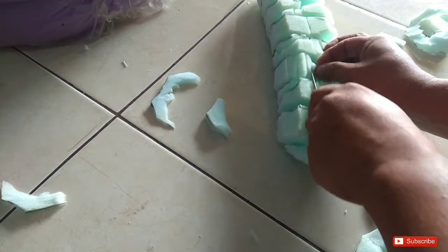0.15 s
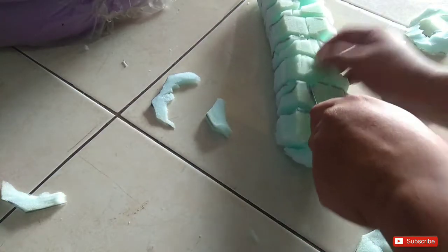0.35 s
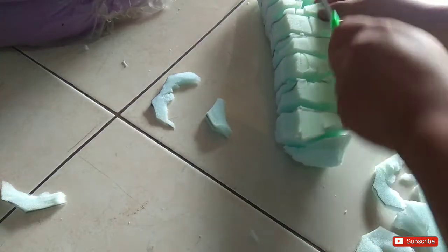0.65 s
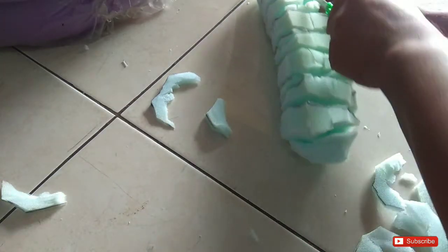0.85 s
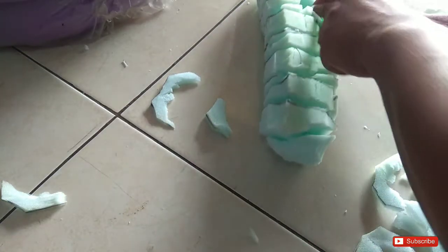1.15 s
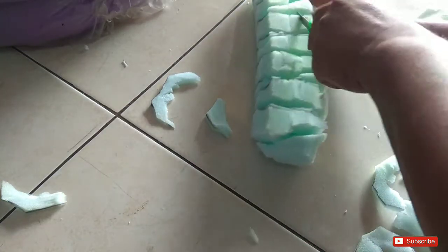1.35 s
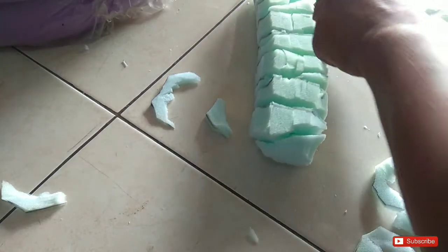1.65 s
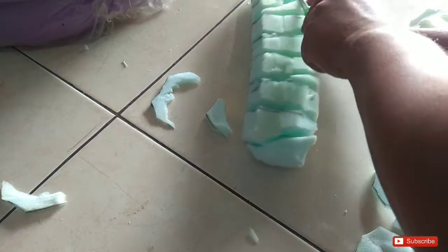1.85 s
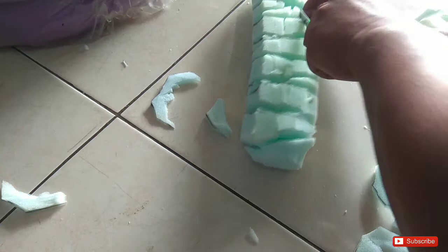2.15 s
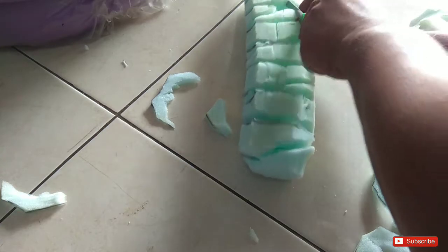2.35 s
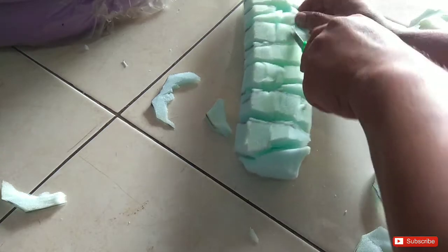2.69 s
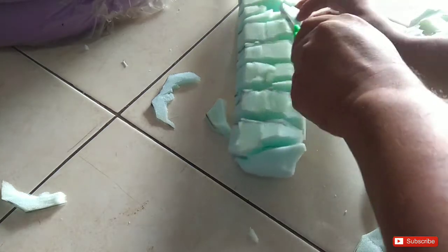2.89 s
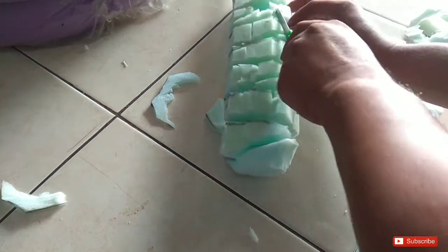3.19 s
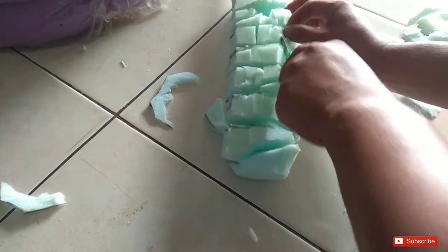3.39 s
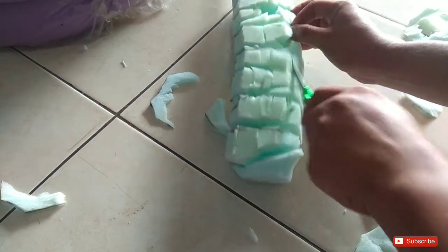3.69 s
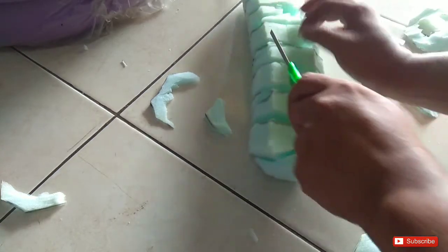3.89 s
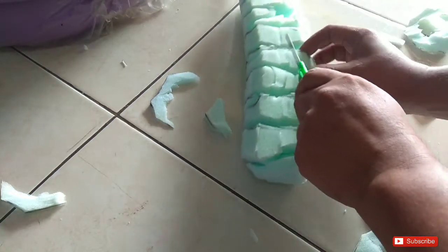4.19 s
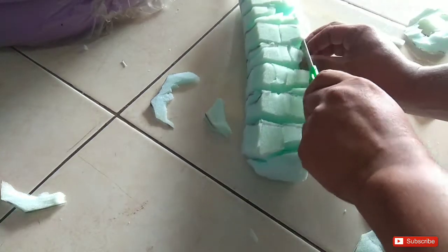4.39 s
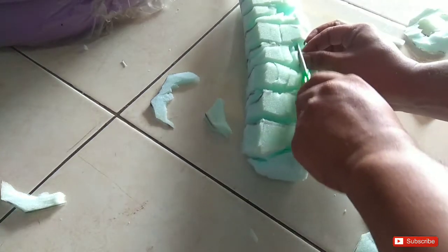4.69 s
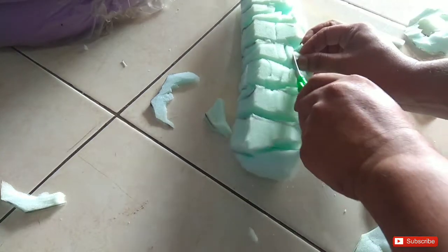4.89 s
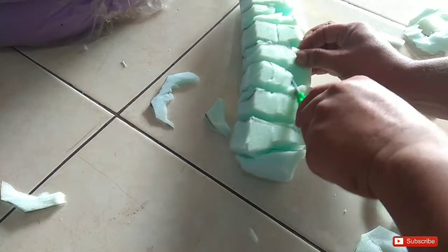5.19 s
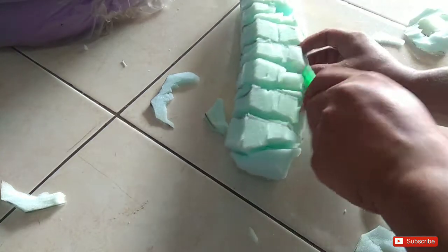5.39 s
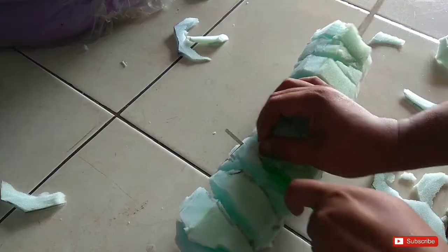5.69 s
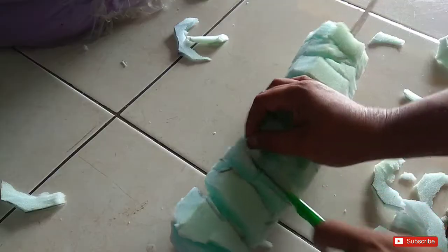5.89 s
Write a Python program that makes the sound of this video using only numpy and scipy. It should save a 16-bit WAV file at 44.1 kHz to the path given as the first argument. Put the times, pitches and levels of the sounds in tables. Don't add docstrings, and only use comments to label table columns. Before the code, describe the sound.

A knife saws slowly through foam close to a phone in a hard tiled room: airy tearing scrapes, dry snaps, faint steel ringing. Outside, a motorbike's blurred putter turns away and fades within three seconds. Quieter cutting follows, with one sharp loud snap, then an abrupt change brings a nearer, swelling low engine throb under more scrapes.

```python
import sys
import numpy as np
from scipy import signal
from scipy.fft import rfft, irfft, next_fast_len
from scipy.io import wavfile
from scipy.ndimage import uniform_filter1d

SR = 44100
rng = np.random.default_rng(int(sys.argv[2]) if len(sys.argv) > 2 else 0)


def wav_out(sig):
    wavfile.write(sys.argv[1], SR, np.round(np.clip(np.atleast_2d(sig).T, -1, 1) * 32767).astype(np.int16))


def linear_from_db(decibels):
    return 10 ** (np.asarray(decibels, float) / 20)


N = 266805
T = np.arange(N) / SR
M = next_fast_len(N + SR // 4)
F = np.maximum(np.fft.rfftfreq(M, 1 / SR), 1)
CUT_S = 5.518


def curve(table, off_db=-130):
    s, *columns = np.transpose(table)
    out = [np.interp(T, s, c) for c in columns]
    outside = (T < s[0]) | (T > s[-1] + 1 / SR)
    out[0] = np.where(outside, off_db, out[0])
    return out


def on_log(points):
    hz, value = np.transpose(points)
    return np.interp(np.log(F), np.log(hz), value)


def shape(x, gain):
    y = irfft(rfft(x, M) * gain, M)[..., :N]
    return y / np.sqrt(np.mean(y ** 2))


def resonances(peaks):
    total = 0
    for k, (hz, width_hz, db) in enumerate(peaks):
        detune = (F / hz - hz / F) * hz / width_hz
        total = total + (-1) ** k * linear_from_db(db) / (1 + 1j * detune)
    return total


def swells(s, db, rise_s, fall_s):
    roundness = 1.11
    power = np.full((len(db), N), 1e-13)
    for s, rise_s, fall_s, *db in np.broadcast(s, rise_s, fall_s, *db):
        first_s = max(s - 2.5 * rise_s, CUT_S * (s > CUT_S))
        span = slice(int(first_s * SR), int((s + 2.5 * fall_s) * SR))
        age = T[span] - s
        skirt_db = -20 * np.maximum(age / fall_s, -age / rise_s) ** roundness
        power[:, span] += (linear_from_db(np.c_[db]) * linear_from_db(skirt_db)) ** 2
    return np.sqrt(power)


# freq_hz, likeness
LIKENESS = [(60, 1), (300, 0.95), (700, 0.69), (1500, 0.29), (5000, 0.11), (15000, 0.096)]


def noise():
    like = np.clip(on_log(LIKENESS), 0, 1)
    pair = rng.standard_normal((2, N))
    mid, side = rfft(pair, M) * np.sqrt([1 + like, 1 - like])
    return irfft(np.array([mid + side, mid - side]) / 2 ** .5, M)[:, :N]


def room(x, t60_s, wet_db):
    tail = noise()[:, :SR // 2] * linear_from_db(-60 * T[:SR // 2] / t60_s)
    tail = tail / np.sqrt(np.sum(tail[0] ** 2))
    wet = signal.fftconvolve(np.atleast_2d(x), tail, axes=1)[:, :N]
    return x + linear_from_db(wet_db) * wet


def patchy(x, patchy_db, hold, span):
    t, z = signal.stft(x, SR, nperseg=512)[1:]
    shared, differing = rng.standard_normal((2,) + z.shape[1:]) * [[[1]], [[.45]]]
    chance = np.array([shared + differing, shared - differing])
    chance = chance[:, np.arange(z.shape[1]) // span]
    chance = chance[:, :, np.arange(z.shape[2]) // int(hold)]
    depth_db = np.interp(t, T, patchy_db + 0 * T)
    gain = linear_from_db(depth_db * uniform_filter1d(chance, size=4, axis=2))
    return signal.istft(z * gain, nperseg=512)[1][:, :N]


def firing(rate, jitter, scatter_db):
    chance = rng.standard_normal((400, 2))
    turns = np.cumsum(np.interp(T, *np.transpose(rate))) / SR
    edges = np.arange(400) + jitter * chance[:, 0]
    cycle = np.searchsorted(edges, turns)
    size = linear_from_db(scatter_db * chance[cycle, 1])
    pulses = size * (np.diff(cycle, prepend=cycle[0]) > 0)
    return pulses, size, np.maximum(turns - edges[cycle - 1], 0)


# peak_s, tear_db, rise_s_per_20db, fall_s_per_20db, pressure_rel_db
STROKES = [(.4, -63.5, 4, 0.73, 14.5), (0.239, -44.5, 0.43, -0.06, 3), (1.169, -48, 0.04, 0.15, 0.2),
           (1.47, -69, 0.06, 0.15, -12), (2.061, -78, 0.15, 0.4, -14), (2.413, -53.5, 0.028, 0.07, -4.5),
           (2.534, -50, 0.08, 0.12, 0), (3.6, -64.5, 0.14, 0.07, -9), (4.849, -63, 0.16, 0.06, -1.5),
           (5.018, -71, 0.01, 0.18, -10), (5.105, -46.5, 0.0866, 0.07, 1), (5.746, -47, 0.13, .09, 4.5),
           (5.875, -54.5, 0.3, 0.14, 0.5), (6.05, -57.5, 0.3, .1, 2.5)]
# peak_s, tear_db, rise_s_per_20db, fall_s_per_20db, pressure_rel_db
SQUEAKS = [
    (1.47, -70.5, -0.2, 0.3, 14),
    (3.464, -52, 0.0046, 0.06, -6),
    (4.441, -68, 0.05, 0, -6),
    (4.692, -60, 0.045, 0.08, -10),
    (5.119, -56.5, 0.0647, 0.07, 2),
]
# peak_s, tear_db, fall_s_per_20db, pressure_rel_db
CATCHES = [(0.013, -40.5, 0, 10), (0.526, -52, 0.06, 10), (1.08, -50.5, 0.21, -12), (2.084, -59, 0.06, 4.5),
           (2.259, -77, 0.05, 24), (3.337, -49.5, 0.05, -5), (3.353, -58, 0.19, -10),
           (3.562, -57, 0.05, -2), (3.665, -41, 0.0161, 8), (3.682, -52.5, 0.08, 5.5),
           (4.632, -59, 0.06, 2), (5.524, -64, 0, -2), (5.547, -59.5, 0.35, 5)]
# freq_hz, density_db_per_hz
FOAM = [(590, -57), (1000, -14), (1570, -16.5), (1720, -12.5), (2760, -9), (3320, -3), (3600, -2.5),
        (4140, -5), (5340, -4), (7120, -3), (7810, -8.5), (13800, -16), (15800, -23.5)]
# freq_hz, width_hz, level_db
STEEL = [(4505, 150, -3.5), (5987, 320, 3), (7940, 380, 2), (8710, 110, 6), (10560, 470, 0),
         (11000, 100, -2)]


def blade():
    stroke_ring_db, squeak_ring_db, catch_ring_db = -4, 7.5, -7
    catch_rise_s = 0.0067
    edge_hz, under_share = 4070, 0.13
    rows = [row + (stroke_ring_db,) for row in STROKES]
    rows += [row + (squeak_ring_db,) for row in SQUEAKS]
    rows += [(s, db, catch_rise_s, fall_s, low_db, catch_ring_db) for s, db, fall_s, low_db in CATCHES]
    s, db, rise_s, fall_s, low_db, ring_db = np.transpose(rows)
    levels = swells(s, [db, db + low_db, db + ring_db], rise_s, fall_s)
    force, deep, free = uniform_filter1d(levels, size=60)
    crack_size = linear_from_db(2.74 * np.minimum(rng.exponential(size=N), 1.7))
    cracks = (rng.random(N) < 2500 / SR) * crack_size
    tear = (0.43 + 9 * uniform_filter1d(cracks, size=40)) * noise()
    foam = linear_from_db(on_log(FOAM))
    share = np.clip((F - 7500) / 2000, 0, 1)
    thinning = under_share + 1 / (1 + (edge_hz / F) ** 14)
    high = shape(tear, foam * share)
    low = shape(tear, foam * (1 - share) * thinning)
    ring = patchy(shape(tear, resonances(STEEL) ** 1.6), 3.5, hold=16, span=6)
    ring_weight = (np.maximum(force, linear_from_db(-72.0)) / linear_from_db(-58.5)) ** -.23
    sound = 1.12 * force * high + linear_from_db(-3.0) * deep * low + linear_from_db(-4.0) * free * ring_weight * ring
    return patchy(room(sound, .12, -8), 2.2, hold=12, span=4)


# freq_hz, width_hz, level_db
CHAIN = [(1130, 180, -9.5), (1484, 207, 2), (1830, 406, 0.5), (2273, 500, -5), (3150, 1220, -13.5)]
# freq_hz, width_hz, level_db
TYRES = [(2400, 650, 0.5), (3350, 970, -3.5)]


def chain_and_tyres(puffs):
    chain = shape(puffs * noise(), resonances(CHAIN) ** 1.08 / (1 + (F / 3700) ** 6))
    tread = np.sqrt(sum(np.abs(resonances([peak])) ** 4 for peak in TYRES))
    tyres_db = -9.5 - np.minimum(35 * np.maximum(T - 1.64, 0), 12)
    return chain + linear_from_db(tyres_db) * shape(puffs * noise(), tread)


# freq_hz, density_db_per_hz
AIR = [(2600, -6), (3500, -6.5), (5000, -7), (6500, -13), (7600, -6), (8300, -0.5), (9200, -6.5),
       (10500, -8), (11600, -6), (12600, -13.5), (15000, -30)]
# freq_hz, change_db
AIR_FAR = [(2600, -3), (3900, 1), (4600, 0), (7300, -1), (8100, 4), (9200, -2), (11500, 2.5), (15000, 6)]


def air_hiss(puffs, gone):
    whine = linear_from_db(-8) * shape(noise(), resonances([(4640, 35, 0)]) ** 2)
    whine = whine * np.clip(np.minimum(.1 + 1.6 * T, (1.0 - T) / .35), 0, 1)
    air = shape((0.72 + puffs) * noise(), linear_from_db(on_log(AIR)) * (F > 2500))
    far = irfft(rfft(air, M) * linear_from_db(on_log(AIR_FAR)), M)[:, :N]
    air = (1 - gone) * air + gone * far
    return patchy(air, np.interp(T, [.6, 1.3], [2.5, 5]), hold=10, span=2) + whine


# start_s, exhaust_db
LEAVING = [(0.0, -41), (0.13, -45), (0.41, -47), (0.75, -53), (0.95, -59.5), (1.04, -56.5), (1.15, -49),
           (1.4, -51.5), (1.6, -49.5), (1.86, -52.5), (2.05, -53), (2.16, -58), (2.4, -65.5), (2.75, -72),
           (3.21, -84.5), (3.4, -92)]
# start_s, rate_hz
LEAVING_HZ = [(0, 30.09), (.5, 25.95), (2, 24.38), (3.4, 22.84)]
# freq_hz, width_hz, level_db
CASE = [(303.6, 104, -3), (398.4, 73, 0.5), (470, 50, -1), (1065, 48, -2), (1243, 37, -5)]
# freq_hz, width_hz, level_db
EXHAUST = [(611, 158, 1.5), (760, 94, 5), (812, 237, 0.5)]
# peak_s, level_db
GAPS = [
    (.925, -61),
    (1.16, -58),
    (1.285, -65),
    (1.53, -53.5),
    (1.89, -58.5),
    (2.07, -58.5),
]


def leaving_bike():
    corner_s, corner_length_s = 0.67, 0.34
    tail_late_s, tail_length_s = 0.26, .13
    case_db, case_hidden_db, case_opens_s = 0.8, -15.5, 0.06
    beat_hidden = 0.46
    gap_s = 0.079
    db = curve(LEAVING)[0]
    hidden = np.clip((T - corner_s) / corner_length_s + .5, 0, 1)
    gone = np.clip((T - corner_s - tail_late_s) / tail_length_s + .5, 0, 1)
    case_db = case_db + hidden * (case_hidden_db - case_db) - 20 * np.exp(-T / case_opens_s * 2)
    chain_db = (1 - gone) * (-50 - 7 * T - db) + gone * -7
    air_db = np.maximum(-41.5 - 13.5 * T + gone * -13.5, -89.5)
    air_db = np.minimum(air_db, db)
    pulses, size, phase = firing(LEAVING_HZ, jitter=0.0639, scatter_db=1.5)
    puffs = size * (2.12 + 0.83 * np.exp(-phase / 0.083))
    beat = 1.03 * (1 - hidden * (1 - beat_hidden)) * shape(room(pulses, 0.33, 8.9), 1)
    gas = beat + puffs * noise()
    case = shape(gas, resonances(CASE) ** 2)
    upper = shape(gas, resonances([(850, 152, 0)]) ** 2)
    exhaust = shape(gas, resonances(EXHAUST) ** 2) + linear_from_db(-13 + 4 * T) * upper
    peak_s, gap_db = np.transpose(GAPS)
    gaps = swells(peak_s, [gap_db], gap_s, gap_s)[0]
    low = exhaust + np.hypot(linear_from_db(case_db), gaps / linear_from_db(db)) * case
    low = low + linear_from_db(chain_db) * chain_and_tyres(puffs)
    depth_db = np.interp(T, [2.1, 2.7], [2.3, 5.5])
    return linear_from_db(db) * patchy(low, depth_db, hold=8, span=1) + linear_from_db(air_db) * air_hiss(puffs, gone)


# freq_hz, density_db_per_hz
STREET = [(15, -52), (25, -29), (64, -28), (95, -45), (117, -53), (141, -6.5), (219, -7.5), (270, -4),
          (380, -19.5), (411, -13.5), (1230, -28.5), (10500, -32.5), (13000, -38)]
# peak_s, level_db
RUMBLE = [(.09, -63), (.43, -54.5), (.8, -52.5), (1.04, -56), (1.27, -55.5), (1.5, -59.5), (1.75, -55.5),
          (1.91, -58), (2.85, -66), (3.83, -61), (4.11, -67), (4.53, -70), (4.95, -67.5), (5.199, -69),
          (5.33, -68), (5.46, -68.5)]


def street():
    street_db, rumble_db = -64.5, -71
    rise_s, fall_s = 0.16, 0.19
    floor = linear_from_db(street_db - 10.5) * shape(noise(), linear_from_db(on_log(STREET)) * (F < 13000))
    peak_s, db = np.transpose(RUMBLE)
    level = np.hypot(linear_from_db(rumble_db), swells(peak_s, [db], rise_s, fall_s)[0])
    drone = shape(noise(), resonances([(143.6, 51, 5.5), (95.0, 106, -9.5)]))
    rumble = level * linear_from_db(-3.0) * drone
    return patchy(floor, 3.66, hold=7.8, span=1) + patchy(rumble, 3.45, hold=10, span=3)


# start_s, length_s, freq_hz, width_hz, level_db
RINGS = [(0.58, 0.3, 4640, 53, -65), (1.14, 0.98, 8220, 300, -76), (1.27, 0.55, 11200, 900, -74.5),
         (1.38, 0.67, 13900, 2000, -83.5), (2.08, .04, 6000, 500, -62), (2.084, 0.035, 3840, 480, -64),
         (2.256, 0.047, 3900, 820, -57.5), (2.253, 0.04, 5870, 440, -68), (3.331, 0.0079, 2200, 400, -71),
         (3.333, 0.0086, 3630, 330, -63), (3.345, 0.068, 9900, 200, -68), (3.367, 0.052, 6000, 300, -63.5),
         (3.455, 0.043, 5860, 298, -56), (3.457, 0.024, 3300, 200, -70), (3.662, 0.01, 2140, 580, -63),
         (3.662, .06, 4100, 780, -55), (3.56, 0.064, 3460, 540, -65), (4.412, 0.08, 4340, 150, -69.5),
         (4.412, 0.042, 5970, 240, -72), (4.43, 0.062, 6280, 121.5, -70), (4.434, 0.058, 7810, 91, -69),
         (4.406, 0.087, 9600, 200, -66.5), (4.618, 0.025, 4170, 200, -68.5), (4.664, 0.076, 4800, 140, -93),
         (4.672, 0.081, 6360, 300, -62), (4.63, 0.16, 8700, 300, -69), (4.81, 0.095, 4100, 170, -79),
         (4.812, 0.038, 11600, 1700, -64), (4.983, 0.1, 5920, 500, -68), (5.046, 0.15, 4840, 470, -59),
         (5.094, 0.091, 4400, 240, -63), (5.071, 0.12, 6400, 380, -55.5), (5.314, 0.012, 5360, 350, -62),
         (5.314, 0.013, 6800, 360, -65), (5.311, .015, 8700, 400, -66.5), (5.738, 0.065, 1230, 340, -58.5),
         (0.74, 0.034, 4600, 770, -64), (5.31, 0.025, 10500, 460, -63.5), (5.2, 0.078, 13600, 400, -70),
         (4.41, 0.062, 12500, 2300, -72)]
# start_s, length_s, freq_hz, width_hz, level_db
OPENINGS = [
    (0, 0.4, 1080, 250, -52.5),
    (.5, 0.53, 1570, 120, -59),
    (.67, 0.32, 145.7, 45.3, -54.5),
    (0.717, 0.25, 45, 40, -73.5),
    (5.148, 0.45, 55, 40, -79),
    (5.3, .2, 150, 60, -67),
    (5.597, 0.39, 55, 40, -66),
]
# start_s, length_s, freq_hz, width_hz,
# level_db
BODY_BANDS = [(0.894, 0.21, 10400, 5000, -62), (3.47, 0.046, 3280, 870, -71.5), (3.33, .012, 1180, 450, -69),
              (3.456, .016, 2700, 1200, -68), (3.2, 0.016, 1500, 500, -70), (3.474, 0.015, 2900, 910, -70),
              (3.553, 0.022, 3200, 1000, -65), (3.37, .03, 3360, 400, -73.5), (3.66, 0.04, 1300, 490, -72),
              (5.07, 0.085, 3000, 630, -71), (2.49, 0.098, 2460, 1100, -72.5), (2.4, .03, 3010, 780, -73),
              (4.81, 0.066, 3470, 1000, -72.5)]


def rings():
    source, out = noise(), np.zeros((2, N))
    for s, length_s, hz, width_hz, db in RINGS + OPENINGS + BODY_BANDS:
        span = slice(int(s * SR), int((s + length_s) * SR))
        edges_hz = [hz - width_hz / 2, hz + width_hz / 2]
        sos = signal.butter(2, edges_hz, "band", fs=SR, output="sos")
        band = signal.sosfilt(sos, source[:, span])
        band = band / np.sqrt(np.mean(band ** 2))
        age = np.clip((T[span] - s) / length_s, 0, 1)
        out[:, span] += linear_from_db(db + 2.5) * np.sin(np.pi * age ** 0.62) * band
    return room(out, 0.23, -9.5)


# start_s, peak_db, top_rel_db, left_minus_right_db, length_ms
SNAPS = [(0.009, -42.5, -9, -24, 3.3), (0.416, -42, -11.5, -16, 3.5), (0.526, -39, -10, -8, 3.5),
         (.9, -56, -2, -9, 3), (0.913, -50, -2, -6, 3), (.942, -49, 5, -3, 3.5), (.964, -53, 5, 2, 3.4),
         (1.104, -50.5, -4, -3, 3.3), (1.153, -45, -5, 2, 4.4), (5.065, -43, -2, 2, 3),
         (3.448, -50.5, 3, 4, 3.4), (1.2231, -38.5, -14, -3, 4), (1.4526, -52, -5.5, 8, 4.3),
         (2.0864, -41.5, -23, 0, 2.8), (2.2555, -48, -24, 4, 1.1), (2.404, -53, 9, -3, 8.0),
         (2.506, -45, -1, 2, 2.7), (2.523, -42, -3, 2, 3.9), (2.548, -46, -1, 9, 3),
         (3.333, -39.5, -3, 0, 6.2), (3.375, -43.5, 4, 0.5, 7.3), (3.4582, -38.5, -3, 10.5, 9.0),
         (3.475, -36, -7, -6.5, 2.5), (3.557, -41.5, -1.5, 2, 5.2), (3.653, -38.5, 1, -6, 2.7),
         (3.6639, -21.5, -10, 4, 1.47), (3.67, -26.5, -10, 4, 2.4), (3.729, -39.5, -9, 2, 3.7),
         (4.6308, -57, 5, 11, 4.1), (4.684, -49, 0, 12, 2.5), (4.854, -51, 2, 0, 2.7),
         (4.82, -62, 12.5, 8, 3.6), (4.846, -54, 4, 8, 11), (5.006, -59, -1, 10, 4.6),
         (5.086, -40.5, -6, 17, 3.2), (5.316, -60.5, -1, 16, 2.8), (5.5494, -36.5, -10, -2, 3),
         (5.575, -39, -2, 2, 4)]


def snaps():
    body_db = -29.5
    click_share, click_hz = 0.5, 6580
    bands = []
    for hz, width_hz in ((1900, 4100), (6480, 5800), (11200, 4300)):
        low_cut = 1 + (0.53 * hz / F) ** 8
        bands.append(shape(noise(), resonances([(hz, width_hz, 0)]) ** 3 / low_cut))
    out = np.zeros((2, N))
    age = T[:SR // 25]
    click = click_share * np.sin(2 * np.pi * click_hz * age) * np.exp(-age * 900)
    for s, db, top_db, pan_db, length_ms in SNAPS:
        attack = 1 - np.exp(-age * 1900 / length_ms)
        burst = 2.2 * attack * np.exp(-(age * 1000 / length_ms) ** 1.7)
        i = int(s * SR)
        span = slice(i, i + len(age))
        colour = sum(linear_from_db(g) * b[:, span] for g, b in zip((body_db, 0, top_db), bands))
        colour = colour + (1.1 / length_ms) ** 2 * click
        port_db = db - 5.0 + np.array([[pan_db], [-pan_db]]) / 2
        out[:, span] += linear_from_db(port_db) * burst * colour
    return room(out, 0.22, -15.5)


# start_s, pitch_hz, length_s, level_db
LEAKS = [(0.616, 470, 0.17, -56.5), (2.785, 600, 0.031, -76), (2.165, 2035, 0.097, -71),
         (2.501, 1456, 0.046, -75), (2.911, 838, 0.025, -70), (3.058, 865, 0.032, -75),
         (3.457, 1570, 0.013, -64), (3.47, 2060, 0.087, -79), (3.718, 613, 0.054, -60.5),
         (3.763, 603, 0.021, -65.5), (3.787, 605, 0.021, -69), (3.811, 235.3, 0.055, -57),
         (3.827, 470, 0.04, -61), (3.856, 1537, 0.067, -77), (3.857, 561, 0.046, -67.5),
         (3.896, 540, 0.027, -55.5), (4.838, 3770, 0.027, -61.5), (4.966, 476, 0.09, -75),
         (5.07, 1460, .01, -76), (5.081, 1286, 0.0093, -65.5), (5.093, 1420, .01, -69),
         (5.104, 1380, .008, -79), (5.115, 1380, .012, -84), (5.203, 467, 0.06, -55.5),
         (2.978, 850, 0.025, -79), (5.311, 5280, 0.035, -75.5), (5.354, 2040, 0.056, -75),
         (5.719, 240.8, 0.088, -46), (5.768, 151.6, 0.08, -41), (5.872, 172, .13, -38.5),
         (5.622, 135.6, 0.042, -54), (5.73, 133, 0.071, -48), (5.835, 136, 0.075, -49),
         (6.015, 150.5, 0.049, -45), (6.008, 430, 0.052, -51)]


def leaks():
    wander_hz = 12.04
    out = np.zeros(N)
    steps = uniform_filter1d(rng.standard_normal(N), size=150)
    wander = np.cumsum(steps) * np.sqrt(wander_hz / SR / (2 * np.pi))
    for (s, hz, length_s, db), turn in zip(LEAKS, rng.random((len(LEAKS), 2))):
        span = slice(int(s * SR), int((s + length_s) * SR))
        age = np.clip((T[span] - s) / length_s, 0, 1)
        waver = 1 + 0.3 * np.sin(2 * np.pi * (38 * T[span] + turn[0]))
        tone = np.sin(2 * np.pi * (hz * T[span] + turn[1] + wander[span]))
        out[span] += linear_from_db(db + 8.5) * np.sin(np.pi * age ** 0.66) * waver * tone
    return room(out, 0.14, -8.0)


# start_s, throb_db
NEAR = [
    (5.515, -76),
    (5.525, -46.5),
    (5.647, -37.5),
    (5.739, -36),
    (5.939, -34.5),
    (5.995, -37),
    (6.05, -34),
]
# start_s, rate_hz
NEAR_HZ = [(5.5, 33.15), (5.8, 33.52), (5.95, 34.66), (6.05, 34.97)]
# freq_hz, width_hz, level_db
PIPE = [(130, 28.8, -0.5), (172, 28.9, 1.5), (236, 30, -2.5), (295.6, 55, -6), (438, 66, -8.5)]
# freq_hz, width_hz, level_db
RASP = [(540, 300, 5), (662, 260, 1)]
# freq_hz, density_db_per_hz
ROAD = [(700, -10), (850, 13), (1050, 5), (1350, 11.5), (2000, 11), (3000, 12), (4000, 7.5)]


def near_bike():
    road_db, road_share = -55.5, 0.73
    rasp_db, rasp_open_db, opens_s = -26, -16, 5.82
    db = curve(NEAR)[0]
    road_db = road_db + 35.5 - (1 - road_share) * (db + 34.0)
    rasp_db = rasp_db + (rasp_open_db - rasp_db) * np.clip((T - opens_s) / 0.075 + .5, 0, 1)
    pulses, size, phase = firing(NEAR_HZ, jitter=.07, scatter_db=2.5)
    gas = shape(room(pulses, .4, 2), 1) + .8 * size * noise()
    throb = shape(gas, resonances(PIPE) ** 1.46 / (1 + (F / 560) ** 6))
    rasp = shape(gas, resonances(RASP) ** 2 / (1 + (F / 760) ** 8))
    rush = (5.6 + np.exp(-phase / 0.66)) * noise()
    road = shape(rush, linear_from_db(on_log(ROAD)) * (F > 700) * (F < 4200))
    road = (T > NEAR[0][0]) * patchy(road, 3, hold=12, span=1)
    return linear_from_db(db) * (throb + linear_from_db(rasp_db) * rasp + linear_from_db(road_db) * road)


def scene():
    return blade() + leaving_bike() + street() + rings() + snaps() + leaks() + near_bike()


# freq_hz, left_minus_right_db
PORTS = [(60, -0.5), (110, 1), (200, -1), (380, 1.5), (700, -2.5), (1290, 0), (2380, 0.0), (4400, -1.5),
         (8120, -5), (15000, 13.5)]


def through_ports(dry):
    lag_s = .00014
    tilt = linear_from_db(on_log(PORTS) / 2)
    gain = np.array([tilt * np.exp(-2j * np.pi * F * lag_s), 1 / tilt]) * (F < 15830)
    return irfft(rfft(dry, M) * gain, M)[:, :N]


def drop_masked(x, mask_db, busy_db, top_db, under_db):
    hz, _, z = signal.stft(x, SR, nperseg=1024)
    power = np.sum(np.abs(z) ** 2, axis=0) + 1e-18
    smooth = uniform_filter1d(uniform_filter1d(power, size=3, axis=1), size=5, axis=0)
    band_db = 10 * np.log10(smooth)
    around_db = uniform_filter1d(band_db, size=41, axis=0)
    busy = 10 * np.log10(power[hz > 350].sum(axis=0)) > busy_db
    luck = rng.standard_normal(power.shape)
    luck = luck[np.arange(len(hz)) // 5][:, np.arange(len(busy)) // 5]
    hz = hz[:, None]
    limit_db = mask_db + 1.7 * np.exp(-((hz - 4400) / 1500) ** 2)
    weak = band_db - around_db + 3.0 * luck < limit_db
    starved = weak & busy & (hz > 2600)
    total_db = 10 * np.log10(uniform_filter1d(power.sum(axis=0), size=5))
    faint = around_db + 3.0 * luck < np.maximum(top_db, total_db - under_db)
    faint = faint & (hz > 12800)
    return signal.istft(z * ~(starved | faint), nperseg=1024)[1][:, :N]


def low_pass(x):
    return signal.sosfilt(signal.butter(12, 16230, fs=SR, output="sos"), x)


def record(dry):
    heard = through_ports(dry)
    mix = drop_masked(heard, mask_db=-3.0, busy_db=-74.0, top_db=-105, under_db=46.0)
    return low_pass(mix)


dry = scene()
out = record(dry)
wav_out(out)
```